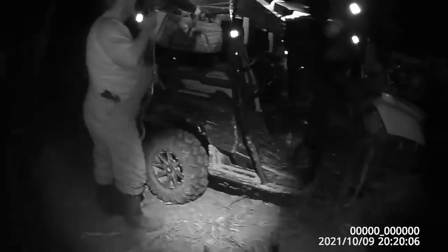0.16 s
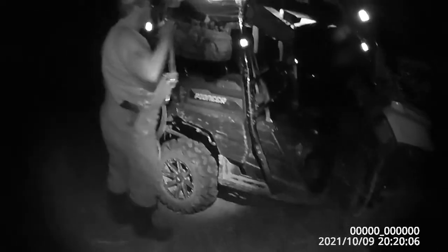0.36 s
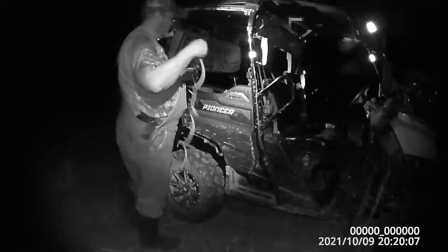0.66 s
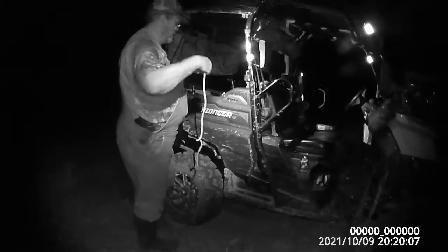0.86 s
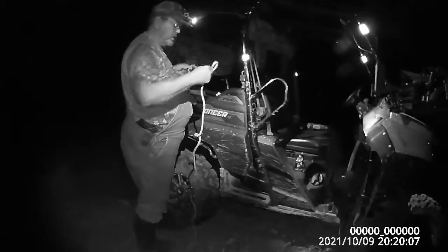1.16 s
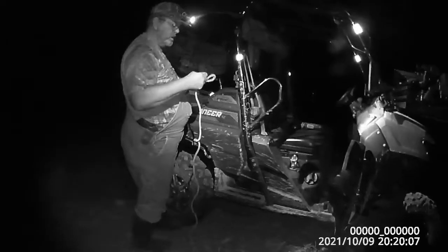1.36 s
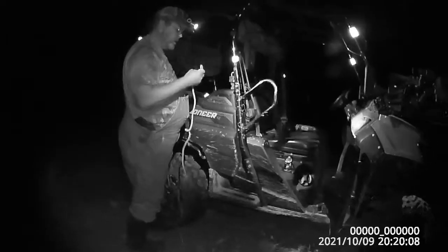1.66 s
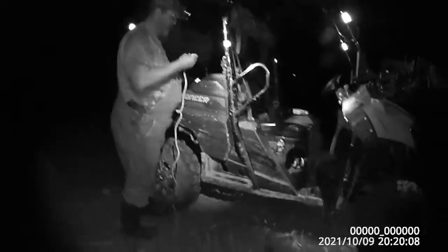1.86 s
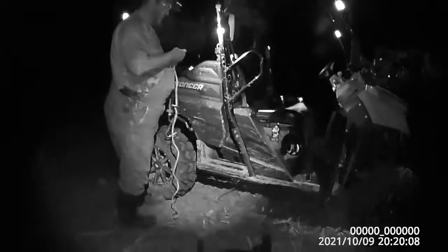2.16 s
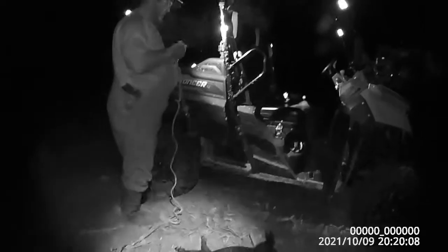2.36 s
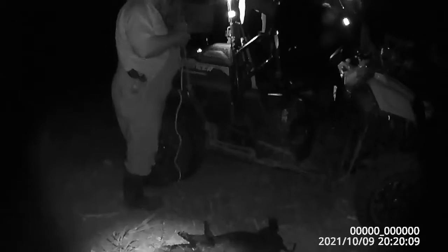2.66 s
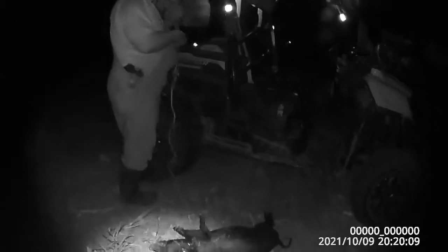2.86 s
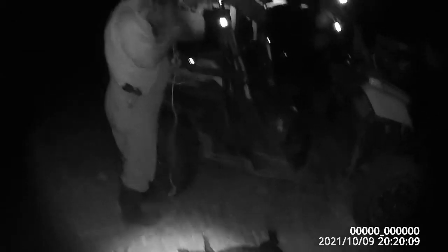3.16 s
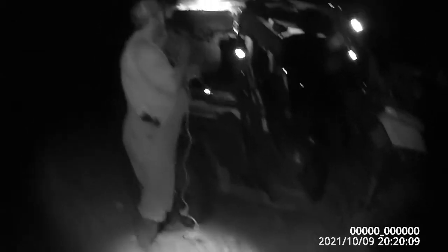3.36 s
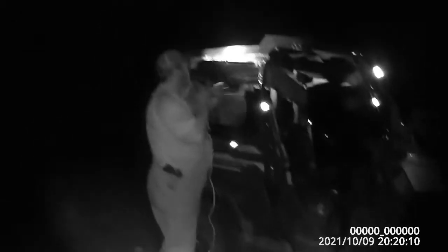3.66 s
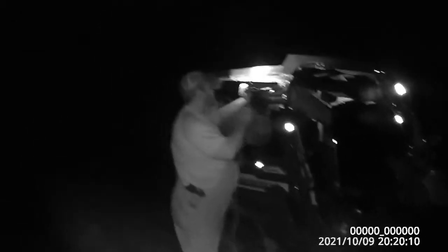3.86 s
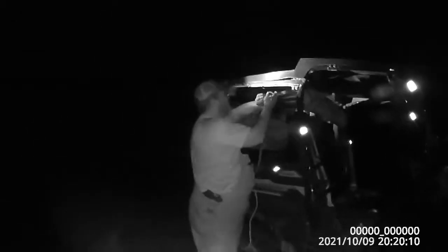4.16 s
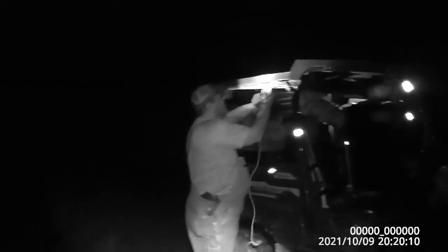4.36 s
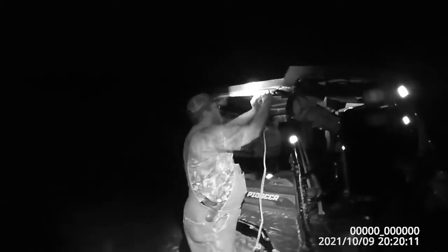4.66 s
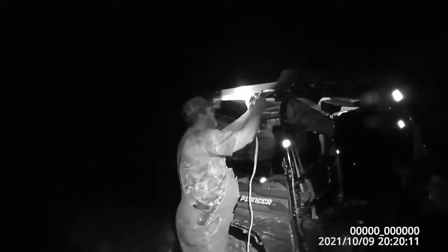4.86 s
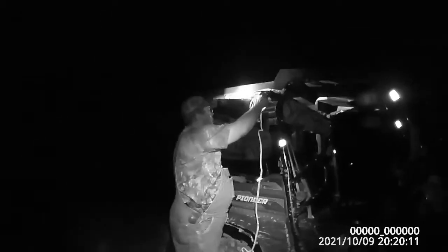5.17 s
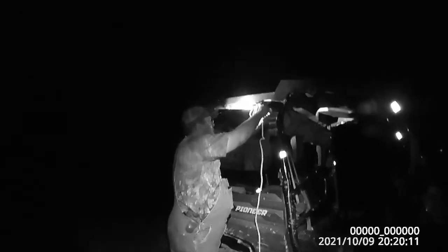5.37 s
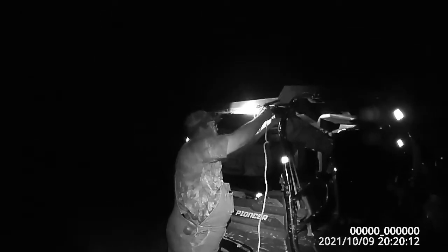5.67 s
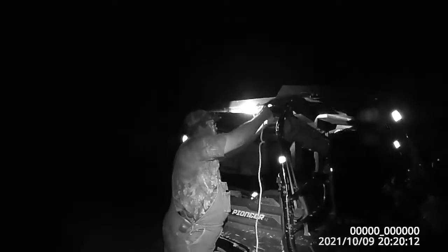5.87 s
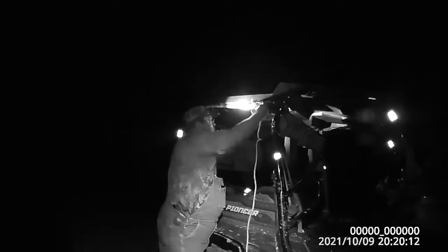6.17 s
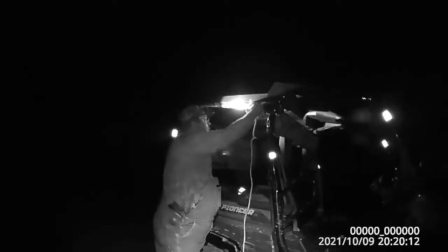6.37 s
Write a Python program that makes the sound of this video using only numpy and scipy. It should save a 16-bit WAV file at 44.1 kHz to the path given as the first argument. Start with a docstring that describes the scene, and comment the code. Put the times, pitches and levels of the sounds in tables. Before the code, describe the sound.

Quiet night with constant insect song, faint rope rustle and dry ticks, soft cloth bumps on the microphone, then bright metallic knocks close by.

```python
"""Night in the open: crickets, air, rumble and a thin electronic whine run throughout, as coloured noise and tones.
From the start a rope rasps through the hands and ticks: coloured noise under pull envelopes, resonant snaps.
Cloth scuffs, and later soft bumps, reach a body-worn camera: shaped noise, pushes and ringing case modes.
Late on, the rope's end clatters on a utility vehicle's metal roof frame: noise bursts, modes and a panel hum."""
import sys
import numpy as np
from scipy import signal
from scipy.fft import rfft, irfft, next_fast_len
from scipy.io import wavfile
from scipy.ndimage import uniform_filter1d

SR = 44100
rng = np.random.default_rng(int(sys.argv[2]) if len(sys.argv) > 2 else 0)


def pcm_store(signal):
    """Save signal as 16-bit PCM."""
    levels = np.round(np.clip(np.atleast_2d(signal), -1, 1) * 32767)
    wavfile.write(sys.argv[1], SR, levels.astype(np.int16).T)


N = 287973
T = np.arange(N) / SR


# Blows on the frame: [t/s, level/dB, ring/dB, favoured f/Hz, low tilt/dB, top tilt/dB, chatter/s]
BLOWS = [(4.582, -49.5, -7, 2800, 29, 4, .0087), (4.589, -37, 0, 4660, -17, -4, .0018),
         (4.650, -21.5, -2.5, 2400, 2.5, 0.5, .005), (4.908, -21.5, 9.5, 5000, -1.5, -3, .012),
         (5.030, -40, 5, 4000, 5, 12, .0017), (5.1667, -34, 6.5, 5270, 14, 5, .017),
         (5.235, -39, 3, 4540, 12.5, -2, .028), (5.3609, -29.5, -1.5, 3950, 3, -3, .0024),
         (5.371, -46, 0, 4100, 15, -9, .04), (5.491, -43, 8, 4500, 13, 4, .026),
         (5.638, -61.5, -12, 2300, 26.5, 14, .013)]
# Bounces of a hard blow: [delay/s, level re blow/dB, ring/dB, favoured f/Hz, chatter/s]
REBOUNDS = [(.0055, -.5, 4.5, 4300, .004), (.016, -11, 0, 2950, .003)]
HARD_BLOW_DB = -26


def landings():
    """Every blow; one above HARD_BLOW_DB bounces and lands again."""
    for s, db, ring_db, favoured_hz, low_db, top_db, chatter_s in BLOWS:
        yield s, db, ring_db, favoured_hz, low_db, top_db, chatter_s
        if db > HARD_BLOW_DB:
            for delay_s, rebound_db, rebound_ring_db, rebound_hz, rebound_chatter_s in REBOUNDS:
                yield (s + delay_s, db + rebound_db, rebound_ring_db, rebound_hz,
                       low_db, top_db, rebound_chatter_s)


# Dense clatter of panels and fittings: [f/Hz, level/dB]
CLATTER_SPECTRUM = [(150, -22), (320, -26.5), (480, -15), (750, -16.5), (1100, -12.5), (1500, -17.5),
                    (2300, -7), (3400, -1.5), (4400, 3), (5200, -2.5), (6100, -15.5), (8500, -27.5),
                    (11000, -40), (15000, -56)]


def frame_clatter(t, chatter_s):
    """Dense contacts last for the chatter, then die away at a fast and a slow rate."""
    free_s = np.maximum(t - chatter_s, 0)  # since the last contact
    fade = undb(-60 * free_s / 0.07) + undb(-21) * undb(-60 * free_s / 0.27)
    contacts = undb(1.7 * walk(734)[:len(t)] - 4.74 * np.minimum(t / chatter_s, 1))
    filter_gain = np.linalg.norm(shape(signal.unit_impulse(len(t)), CLATTER_SPECTRUM))
    return shape(rng.standard_normal(len(t)) * fade * contacts, CLATTER_SPECTRUM) / filter_gain


# Modes of the frame tubes: [f/Hz, relative level/dB, t60/s]
FRAME_MODES = [(487, -27, .3), (598, -32, .25), (1028, -29, .11), (1130, -31, .16), (1241, -29, .14),
               (1464, -25, .12), (1841, -26, .12), (1950, -22, .12), (2268, -15, .13), (2600, -25, .42),
               (2646, -19, .32), (2822, -10, .12), (2920, -17, .16), (3004, -20, .17), (3193, -8, .12),
               (3747, -11, .1), (3991, -17, .14), (4170, -6, .09), (4317, -17, .1), (4502, -6, .08),
               (4785, -20, .1), (4998, -7, .062), (5260, -19, .11), (5358, -22, .13), (7300, -35, .14)]


def frame_ring(t, favoured_hz):
    """Decaying tube modes; each blow lands elsewhere and favours other modes."""
    hz, mode_db, t60_s = np.transpose(FRAME_MODES)[:, :, None]
    favour_db = 16 * np.exp(-((hz - favoured_hz) / 350) ** 2)
    share = undb(mode_db + favour_db + rng.standard_normal(hz.shape))
    tones = np.sin(2 * np.pi * (hz * t + rng.random(hz.shape)))
    modes = share * undb(-60 * t / t60_s) * tones
    return modes.sum(0) / np.linalg.norm(share) * (1 - np.exp(-t / 0.00054))


# Hollow roof panel: [f/Hz, level/dB]
PANEL_SPECTRUM = [(120, -20), (240, 2), (330, -9), (480, 5), (750, -21), (1100, -7), (2000, -12),
                  (5000, -42)]


def panel_hum(t):
    """The hollow roof panel builds up slowly and hums on after a blow."""
    fade = undb(-20.5 - 60 * t / 0.21)
    return noise(PANEL_SPECTRUM, size=len(t)) * fade * (1 - np.exp(-t / 0.016))


def knocks():
    """The rope's end chatters on the frame, leaving tubes ringing and roof humming."""
    out, t = np.zeros(N), T[:SR // 2]
    for s, db, ring_db, favoured_hz, low_db, top_db, chatter_s in landings():
        ring = undb(ring_db - 0.5) * frame_ring(t, favoured_hz)
        blow = frame_clatter(t, chatter_s) + ring + panel_hum(t)
        tilt = [(1400, low_db), (3200, 0), (5300, 0), (8000, top_db)]
        add(out, s, undb(db) * shape(blow, tilt))
    return out + undb(-13) * scatter(low_pass(out, 4000), 0.18)


# Pulls through the hands: [t/s, length/s, level/dB]
ROPE_PULLS = [(.24, .038, -50), (.32, .02, -56), (.902, .067, -48), (1.245, .125, -55.5), (2.69, .02, -58),
              (3.398, .003, -52.5)]
# Light rustle between pulls, less once the rope is paid out: [t/s, level/dB]
RUSTLE = [(0, -62.5), (1.3, -60.5), (1.55, -66), (6.5, -65.5)]
# Sliding fibres: [f/Hz, level/dB]
SLIDE_SPECTRUM = [(300, -3), (1200, -10), (2500, -6.5), (3800, 1.5), (4700, 7.5), (6200, -8), (10000, -18),
                  (15000, -26)]
PULL_ATTACK_S, PULL_RELEASE_S = .025, .055  # per 20 dB


def rope_slide():
    """Fibres rasp through the hands: fluctuating coloured noise under the pulls and rustle."""
    pulls = sum(undb(db) * burst(s, length_s, PULL_ATTACK_S, PULL_RELEASE_S)
                for s, length_s, db in ROPE_PULLS)
    rasp = noise(SLIDE_SPECTRUM) * unit(undb(3.2 * walk(600)))
    return rasp * np.hypot(pulls, curve(RUSTLE))


# Dry ticks of rope and gear: [t/s, peak level before trim/dB, centre f/Hz, t60/s]
ROPE_TICKS = [(.237, -35, 3700, .016), (.239, -42, 8600, .015), (.269, -46, 11500, .005),
              (.3076, -39, 1550, .016), (.309, -35.5, 3720, .023), (.451, -30, 4500, .008),
              (.464, -40, 4600, .008), (.494, -42, 4000, .006), (.69, -40, 4500, .0069),
              (.873, -30, 4900, .0041), (1.344, -45.5, 1310, .021), (1.896, -48, 2380, .067),
              (3.213, -55, 2200, .05), (3.473, -49, 5000, .015), (5.693, -45, 5540, .015),
              (6.134, -46, 4700, .014)]
TICK_TRIM_DB = 3
TICK_CRACK_DB = 14  # first snap re the crackle after it


def rope_ticks():
    """Stiff bits snap: a crack and decaying crackle drive one broad resonance."""
    out, t = np.zeros(N), T[:SR // 10]
    for s, db, hz, t60_s in ROPE_TICKS:
        push = rng.standard_normal(len(t)) * undb(-60 * t / t60_s)
        push[0] = undb(TICK_CRACK_DB)
        resonance = [(hz / 10, -22), (hz * 0.41, -5), (hz, 0),
                     (hz * 1.11, -2), (hz * 1.38, -13), (hz * 10, -55)]
        snap = shape(push, resonance)
        add(out, s, undb(db + TICK_TRIM_DB) * snap / np.abs(snap).max())
    return out


# Bumps on the camera: [t/s, push level before the mount/dB, push/s, case ring/dB]
CAMERA_BUMPS = [(1.891, -17, .0038, -2.5), (1.91, -26, .033, -25), (1.942, -35, .0045, 0),
                (2.064, -29.5, .0065, -5), (2.633, -33, .0089, 0), (3.42, -27.5, .015, -8),
                (3.945, -18.5, .0087, -14), (4.117, -37.5, .0043, -9), (4.236, -29.5, .021, -30),
                (4.498, -32, .009, -14), (4.582, -38, .004, 5), (4.626, -40, .004, 4)]
# Case modes: [f/Hz, level/dB, t60/s]
CASE_MODES = [(186, 0.5, 0.041), (246.6, -3, 0.078)]
MOUNT_HZ = 278


def camera_bumps():
    """Soft pushes recoil and ring the case; the soft mount low-passes both."""
    out, t = np.zeros(N), T[:SR // 5]
    case = sum(undb(mode_db - 60 * t / t60_s) * np.sin(2 * np.pi * hz * t)
               for hz, mode_db, t60_s in CASE_MODES)
    case = case * (1 - np.exp(-t / 0.006))
    for s, db, push_s, ring_db in CAMERA_BUMPS:
        press = np.sin(np.pi * np.minimum(t / push_s, 1)) ** 2
        recoil = np.sin(np.pi * np.clip((t - push_s / 2) / (2.7 * push_s), 0, 1)) ** 2
        add(out, s, undb(db) * (press - .5 * recoil + undb(ring_db) * case))
    return low_pass(out, MOUNT_HZ, order=8)


# Clothing on the camera: [peak t/s, level/dB, rise per 20 dB/s, fall per 20 dB/s]
CLOTH_SCUFFS = [(.28, -48.5, .06, .07), (1.91, -35.5, .033, .028), (2.09, -47, .055, .067),
                (2.25, -55, .25, .14), (3.42, -51, .12, .14), (3.61, -37, .16, .15),
                (4.59, -41.5, .015, .17), (5.35, -58.5, 1.3, 2.2)]
# Rubbing cloth: [f/Hz, level/dB]
RUB_SPECTRUM = [(30, -0.5), (90, 1), (160, -1.5), (265, 0), (330, -24), (450, -26), (1100, -21),
                (1800, -40), (8000, -56)]


def cloth_scuffs():
    """Cloth rubs the camera in little jerks: coloured noise with a fluctuating level."""
    scuffs = [undb(db) * burst(s, 0, rise_s, fall_s) for s, db, rise_s, fall_s in CLOTH_SCUFFS]
    return noise(RUB_SPECTRUM) * unit(undb(1.7 * walk(90))) * np.linalg.norm(scuffs, axis=0)


def stridulate(hz, rate_hz, duty, fall, waver):
    """Each wing stroke draws a scraper over a file: a short tone that sinks as the wing slows."""
    strokes = rng.random() + np.cumsum(rate_hz * (1 + .01 * walk(3))) / SR
    stroke = np.minimum(strokes % 1 / duty, 1)
    pitch_hz = hz * (1 + fall * (.5 - stroke) + waver * walk(60))
    return unit(np.sin(np.pi * stroke) * np.sin(2 * np.pi * np.cumsum(pitch_hz) / SR))


def chorus(hz, spread_hz, rate_hz, fall, waver, count):
    """Many far crickets, each on its own wavering pitch and pace."""
    voices = 0
    for place in np.linspace(-1, 1, count):
        pace_hz = rate_hz * rng.uniform(.7, 1.3) * undb(.8 * walk(9))
        voice_hz = hz + spread_hz * (place + .12 * walk(7))
        voice = stridulate(voice_hz, pace_hz, .85, fall, waver)
        voices = voices + voice * undb(2.7 * walk(8) - 3.2 * place ** 2)
    return unit(voices)


# Low chorus, in-step chirps over unbroken song: [t/s, chirp level/dB, unbroken level/dB]
LOW_CHORUS_LEVELS = [(0, -54, -60), (3, -55, -58.5), (6.5, -57, -57)]
LOW_FIRST_S, LOW_PERIOD_S, LOW_CHIRP_S = .17, .372, .32
HIGH_CHORUS_DB = -52.5


def choruses():
    """Low crickets chirp in step over their own unbroken song; higher ones sing without a break."""
    in_step, unbroken = (curve(np.array(LOW_CHORUS_LEVELS)[:, [0, k]]) for k in (1, 2))
    chirps = in_step * chirping(LOW_FIRST_S, LOW_PERIOD_S, LOW_CHIRP_S)
    low = chorus(2818, 85, 45, .035, .01, count=10) * np.hypot(chirps, unbroken)
    high = chorus(3615, 270, 60, .06, .011, count=18) * undb(HIGH_CHORUS_DB)
    return low + high


# Nearest insect: [t/s, level/dB]
TRILL_LEVELS = [(0, -65), (3.3, -64.5), (4.8, -67), (5.9, -70), (6.5, -68.5)]
# Middle of each break in the trill: [t/s]
TRILL_BREAK_TIMES_S = [.298, 1.595, 1.866, 3.548, 3.755, 4.266, 4.953, 5.775, 6.0]
TRILL_BREAK_S = .104


def near_trill():
    """The nearest insect trills, weaker overall with time, and breaks off now and then."""
    singing = np.all([abs(T - s) > TRILL_BREAK_S / 2 for s in TRILL_BREAK_TIMES_S], axis=0)
    level = uniform_filter1d(singing * curve(TRILL_LEVELS), SR // 200)
    return stridulate(5745, 53, .66, 0.069, .004) * level


# Bouts of the second insect: [first chirp t/s, end t/s]
BOUTS = [(1.775, 4.5), (5.26, 6.55)]
CHIRP_PERIOD_S, CHIRP_S = .287, .1
CHIRP_START_DB, CHIRP_FADE_DB_PER_S = -63.5, 2.1


def faint_chirper():
    """A second insect chirps at an even pace, in bouts that start strong and fade."""
    bouts = 0
    for first_s, end_s in BOUTS:
        active = (T > first_s - CHIRP_S) * (T < end_s)
        level = undb(CHIRP_START_DB - CHIRP_FADE_DB_PER_S * (T - first_s))
        bouts = bouts + chirping(first_s, CHIRP_PERIOD_S, CHIRP_S) * active * level
    return stridulate(5455, 30, 0.94, 0.022, 0.0091) * bouts


# Still night air and microphone hiss: [f/Hz, relative level/dB per Hz]
AIR_SPECTRUM = [(60, 3), (150, -1), (330, -2), (520, 1), (800, -5.5), (1300, -5.5), (2000, -11.5),
                (3100, -2.5), (4700, -12.5), (5400, -10), (6200, -13.5), (7500, -19.5), (10000, -25),
                (15000, -33.5)]


def night_air():
    """Steady coloured noise with a slight drift in level."""
    return noise(AIR_SPECTRUM) * undb(-57.5 + 0.35 * walk(2.49))


# Low rumble: [f/Hz, relative level/dB per Hz]
RUMBLE_SPECTRUM = [(5, -13.5), (13, 4), (28, -4.5), (45, -11), (70, -17), (110, -26), (200, -33.5),
                   (500, -59)]


def rumble():
    """Slow buffeting at the microphone: low noise with a slight drift in level."""
    return noise(RUMBLE_SPECTRUM) * undb(-41.5 + 0.4 * walk(4.1))


WHINE_HZ, FRAME_RATE_HZ = 7882, 60


def camera_whine():
    """Electronic lines spaced by the frame rate, weaker away from the centre."""
    whine = 0
    for k in np.arange(-3, 3) + .5:
        phase = (WHINE_HZ + k * FRAME_RATE_HZ) * T + rng.random()
        whine = whine + undb(-69 - 12.1 * abs(k)) * np.sin(2 * np.pi * phase)
    return whine


def undb(db):
    """Decibels to gain."""
    return 10 ** (np.asarray(db) / 20)


def unit(x):
    """Scale to an rms of one."""
    return x / np.sqrt(np.mean(x ** 2))


def curve(rows):
    """Gain over time from [t/s, level/dB] rows."""
    return undb(np.interp(T, *np.transpose(rows)))


def shape(x, points):
    """Causal minimum-phase filter through [f/Hz, level/dB] points."""
    hz, db = np.transpose(points)
    size = next_fast_len(len(x) + 2048)
    f_hz = np.maximum(np.arange(size // 2 + 1) * SR / size, 1)
    gain = undb(np.interp(np.log(f_hz), np.log(hz), db))
    cepstrum = irfft(np.log(gain), size)
    cepstrum[1:] *= 2  # fold to minimum phase
    response = np.exp(rfft(cepstrum[:size // 2], size))
    return irfft(rfft(x, size) * response, size)[:len(x)]


def noise(points, size=N):
    """Coloured noise of rms one."""
    return unit(shape(rng.standard_normal(size), points))


def low_pass(x, hz, order=2):
    """Causal Butterworth low-pass."""
    return signal.sosfilt(signal.butter(order, hz, "low", fs=SR, output="sos"), x)


def walk(rate_hz):
    """Smooth random wander of rms one: random steps, averaged twice."""
    k = max(int(SR / rate_hz), 1)
    steps = np.repeat(rng.standard_normal(N // k + 1), k)
    return unit(uniform_filter1d(uniform_filter1d(steps, k), k)[:N])


def add(track, s, sound):
    """Mix a sound into the track at time s."""
    i = max(int(s * SR), 0)
    track[i:i + len(sound)] += sound[:max(N - i, 0)]


def scatter(x, t60_s):
    """Diffuse reflections from trees and ground: a decaying noise tail."""
    t = T[:SR // 2]
    tail = rng.standard_normal(len(t)) * undb(-60 * t / t60_s)
    return signal.fftconvolve(x, tail / np.linalg.norm(tail))[:N]


def burst(start_s, length_s, attack_s, release_s):
    """Gain that rises, holds and dies away; attack and release are per 20 dB."""
    before_s = np.maximum(start_s - T, 0)
    after_s = np.maximum(T - start_s - length_s, 0)
    return undb(-20 * (before_s / attack_s + after_s / release_s))


def chirping(first_s, period_s, length_s):
    """Rounded bursts at an even pace, one of them centred on first_s."""
    off_centre_s = (T - first_s + period_s / 2) % period_s - period_s / 2
    return np.cos(np.pi * np.clip(off_centre_s / length_s, -.5, .5))


def scene():
    """Everything at the one microphone."""
    rope_and_frame = knocks() + rope_slide() + rope_ticks()
    handling = camera_bumps() + cloth_scuffs()
    insects = choruses() + near_trill() + faint_chirper()
    background = night_air() + rumble() + camera_whine()
    return (rope_and_frame + handling + insects + background)[None]


TOP_HZ = 15200


def record(dry):
    """Steep elliptic low-pass: the recorder cuts the top."""
    return signal.sosfilt(signal.ellip(8, .2, 70, TOP_HZ, fs=SR, output="sos"), dry)


dry = scene()
out = record(dry)
pcm_store(out)
```